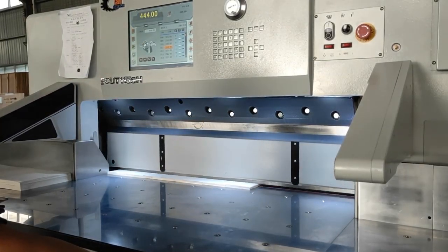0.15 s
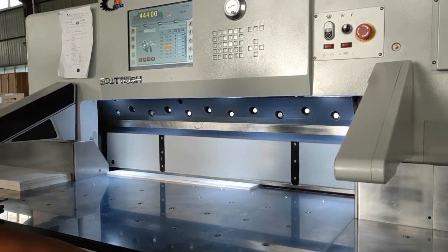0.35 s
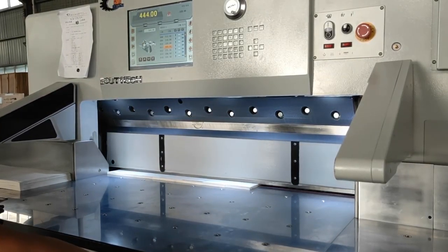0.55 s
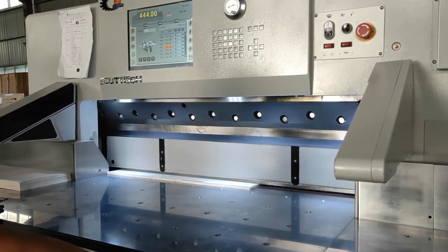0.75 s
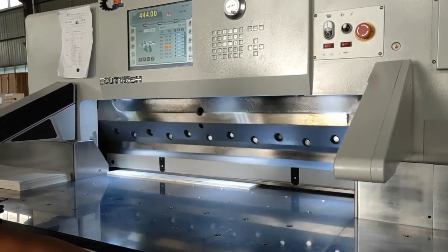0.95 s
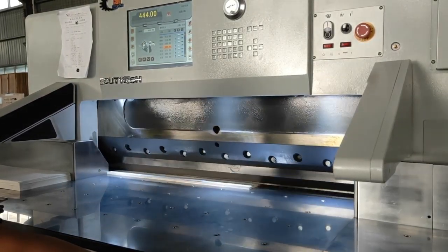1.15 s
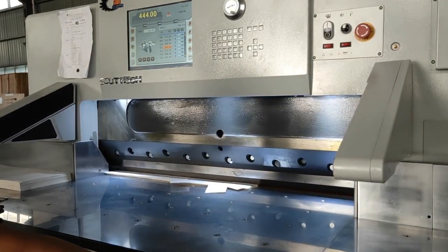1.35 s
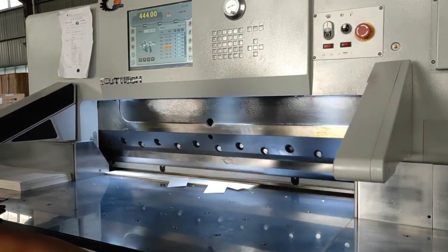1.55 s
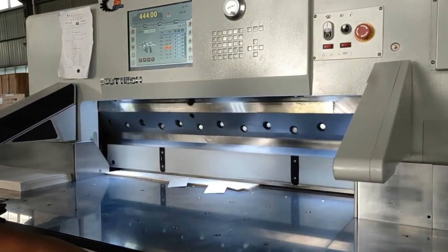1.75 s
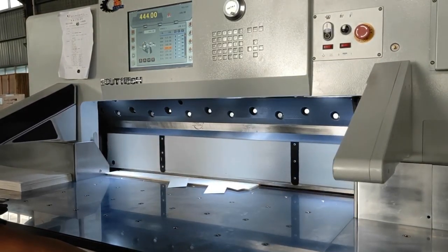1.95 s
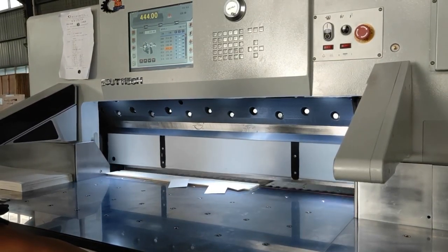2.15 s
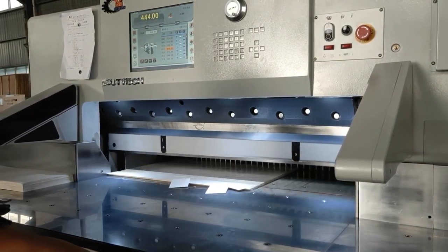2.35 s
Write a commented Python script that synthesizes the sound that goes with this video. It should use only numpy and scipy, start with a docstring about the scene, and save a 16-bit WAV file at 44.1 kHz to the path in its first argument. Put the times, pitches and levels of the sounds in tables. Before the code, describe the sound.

Paper guillotine cycle: heavy clamp thud, gear whir, sharp crunching cut, air hiss, then metallic knocks

```python
"""A workshop with a hydraulic paper cutter, standing to the left: the clamp thumps onto the stack, the drive
engages and hums, the knife shears the paper and hits the bed, air hisses, and the knife bar and clamp knock
at the top of their travel. Blows ring a bank of decaying modes; the hum is a wavering tone; gears, paper,
air and workshop murmur are coloured noise. A decaying noise tail is the room."""
import sys
import numpy as np
from scipy import signal
from scipy.fft import rfft, irfft, next_fast_len
from scipy.io import wavfile
from scipy.ndimage import uniform_filter1d, map_coordinates

SR = 44100
rng = np.random.default_rng(int(sys.argv[2]) if len(sys.argv) > 2 else 0)


def persist_wave(psi):
    """Save psi, clipped to +-1, as 16-bit WAV."""
    counts = np.round(np.clip(psi, -1, 1) * 32767).astype(np.int16)
    wavfile.write(sys.argv[1], SR, np.atleast_2d(counts).T)


def how_loud(loudness_db):
    """Turn decibels into a plain amplitude multiplier (0 dB gives 1, 20 dB gives 10)."""
    steps = np.asarray(loudness_db, float) / 20
    return 10 ** steps


N = 110250

# Workshop murmur of machines. Each row: frequency in Hz, relative density in dB per Hz.
MURMUR_SPECTRUM = [(15, -65.5), (25, -24.5), (81, 5), (118, -12.5), (264, 1.5), (399, -11.5), (533, 5.5),
                   (971, -36.5), (1810, -20), (3500, -25.5), (4550, -55), (7700, -120)]
# Murmur level. Each row: time in seconds, level in dB.
MURMUR_LEVEL = [(0, -49.5), (.2, -50.5), (.6, -53.5), (1.3, -66), (2.3, -76), (2.5, -53)]
# Thin whine of the idling pump. Each row: centre in Hz, width in Hz, level in dB.
PUMP_WHINE = [(1061, 71, -70.5), (2683, 106, -70)]
# Faint background hiss. Each row: frequency in Hz, relative density in dB per Hz.
HISS_SPECTRUM = [(2000, -22), (4500, -17), (7200, -11.5), (9000, -24.5), (11500, -24.5), (13000, -16.5),
                 (14000, -32.5), (16000, -79)]
HISS_DB = -77

# Air flow, early and late stretch. Each row of either: time in seconds, level in dB before AIR_DB.
AIR_FLOWS = [
    [(0.0, -48), (0.15, -59.5), (0.23, -60), (0.304, -49.5), (0.438, -71), (0.6, -100)],
    [(1.3, -43), (1.355, -43), (1.53, -42), (1.6, -39), (1.93, -38.5), (2.14, -39.5), (2.2, -41),
     (2.36, -42.5), (2.5, -53.5)],
]
# Body of the jet. Each row: frequency in Hz, relative density in dB per Hz.
JET_SPECTRUM = [(880, -8), (1500, -4), (1850, -4), (1980, -1), (3060, -4), (4070, -11), (6000, -7),
                (7080, 0.5), (8600, -11.5), (11700, -62)]
# Thin top of the jet. Each row: frequency in Hz, relative density in dB per Hz.
JET_TOP_SPECTRUM = [(5290, -45.5), (9000, -3.5), (9510, -7), (14900, -14.5), (15600, -26)]
# The top of the jet dies first. Each row: time in seconds, level in dB.
JET_TOP_LEVEL = [(1.3, -74), (1.36, -53.5), (1.55, -48.5), (1.6, -46), (2.15, -48), (2.27, -55.5),
                 (2.4, -88.5)]
AIR_DB = 3

# Blows on the machine frame. Each row: start in seconds, relative push in dB, pitch of the struck part in Hz,
# relative crack in dB, relative clatter in dB.
FRAME_BLOWS = [(0.232, -2, 314, -27, -35.5), (0.241, -2.5, 270, -3.5, -27.5), (0.247, 0, 174.4, -14.5, -47),
               (0.264, -9, 221, -18.5, -39), (0.287, -2.5, 195, -29.5, -50), (0.31, -5, 209, -42, -42.5),
               (0.34, -7.5, 213, -32, -37), (0.398, -7.5, 206, -44, -43.5), (0.469, -11.5, 173, -45.5, -96),
               (0.512, -13, 220, -50.5, -94), (0.71, -25, 486, -45, -56), (0.73, -22.5, 302, -31.5, -61),
               (0.806, -32.5, 260, -25.5, -59), (1.283, -5, 362, -32, -22), (1.331, -15.5, 114, -6.5, -63),
               (1.347, -1, 340, -26, -31), (1.357, -0.5, 178, -9.5, -61), (1.375, -4, 314, -39, -41),
               (1.409, -2, 194, -31, -30.5), (1.479, -15.5, 275, -18, -38), (1.491, -23.5, 72, -55, -58),
               (1.996, -14, 266, -26, -29), (2.011, -9, 292, -30, -34), (2.028, -2, 331, -5, -20),
               (2.04, -8.5, 167, -4.5, -33.5), (2.063, -22, 284, -15, -62), (2.083, -15, 125, -43, -35.5),
               (2.14, -24, 475, -16, -21), (2.147, -7, 326, -10, -35.5), (2.157, -13, 380, -49, -65),
               (2.171, -11.5, 240, -17.5, -50), (2.216, -24.5, 80, -58, -31)]
# Modes of the frame. Each row: frequency in Hz, relative level in dB, t60 in seconds.
FRAME_MODES = [(81.6, 4.5, 0.21), (105, 1, 0.35), (139.3, -16, 0.25), (178.5, -7, 0.068),
               (242.3, 10.5, 0.046), (274.6, 2, 0.21), (364.2, 1, 0.31), (468.5, 7, 0.042), (605, 7, 0.015),
               (702, -6.5, 0.087), (846, -2, 0.054), (960, -9, 0.061), (1080, 2.5, 0.0062),
               (1440, -33, 0.014), (1800, -6.5, 0.097), (2670, -19, .03)]
# Loose parts. Each row: frequency in Hz, relative density in dB per Hz.
CLATTER_SPECTRUM = [(400, 1.5), (800, 7), (1200, 2), (1700, -5), (2640, -6.5), (4080, -20), (7130, -17.5),
                    (8300, -23.5), (10100, -44), (15600, -63.5)]
# Bright ticks of steel on steel. Each row: start in seconds, level in dB.
STEEL_TICKS = [(1.409, -28), (2.145, -26)]
TICK_T60_S = 0.069
PUSH_CYCLES = 0.4  # time constant of the push, in cycles of the struck part
THUD_DB, FRAME_DB = 1, -51  # push heard directly, push through the modes
CRACK_DB, CRACK_S, BEAM_HZ = -12.5, 0.00006, 550  # hard contact, on the modes above BEAM_HZ
CLATTER_DB, CLATTER_T60_S, CLATTER_RISE_S = 3, 0.17, 0.002

# Gear-mesh hum. Each row: time in seconds, level in dB.
HUM_LEVEL = [(.56, -85), (.6, -38), (.7, -43.5), (.95, -36), (1.2, -40), (1.4, -35.5), (1.65, -38),
             (1.95, -37), (2.1, -44), (2.3, -51)]
# Gear whir under load. Each row: time in seconds, level in dB before WHIR_DB.
WHIR_LEVEL = [(.71, -88), (.745, -37), (.93, -36), (1.25, -38), (1.6, -39), (1.95, -36.5), (2.05, -53),
              (2.14, -38), (2.25, -46), (2.39, -44), (2.5, -55)]
# Gear noise. Each row: frequency in Hz, relative density in dB per Hz.
GEAR_SPECTRUM = [(350, -55), (600, -27), (710, 2.5), (877, 1.5), (1170, -2.5), (1600, -23), (1970, -23),
                 (4500, -54.5), (5850, -100)]
# Casing resonances. Each row: centre in Hz, width in Hz, boost in dB.
CASING_PEAKS = [(720, 25, 6), (893, 14, 13), (1068, 18, 13), (1150, 18, 15), (1235, 25, 8), (1945, 20, 11),
                (2330, 50, 8)]
# Low gear noise. Each row: time in seconds, level in dB.
GROWL_LEVEL = [(.69, -51), (.72, -28.5), (.88, -36.5), (1.25, -37), (1.6, -33.5), (1.95, -36.5), (2.3, -39),
               (2.5, -52)]
# Housing that colours the growl. Each row: frequency in Hz, relative density in dB per Hz.
HOUSING_SPECTRUM = [(24, -57), (40, -23), (113, -31), (182, -19), (241, -7), (408, -15.5), (509, -20.5),
                    (650, -19.5), (840, -48), (1430, -120)]
MESH_HZ, MESH_WAVER_HZ, MESH_WAVER_DB = 246.5, 1.25, 4
WHIR_DB, SWELL_DB, SWELL_KNOTS_PER_S = 3.5, 1.5, 11.2
SPIN_FROM_S, SPIN_S, SPLIT_HZ = 0.725, 0.047, 710  # gears coming up to speed

# Knife through the stack. Each row: time in seconds, level in dB before SHEAR_DB.
SHEAR_LEVEL = [(1.255, -94), (1.261, -43), (1.266, -18.5), (1.3, -19), (1.315, -30), (1.352, -28),
               (1.36, -57), (1.375, -71.5)]
# Parting paper, also used for the ticks. Each row: frequency in Hz, relative density in dB per Hz.
PAPER_SPECTRUM = [(350, -17), (600, 0), (766, -9), (953, -6.5), (1830, -7.5), (2790, -8.5), (3030, -4.5),
                  (3980, -16), (6950, -4.5), (12800, -27.5), (15500, -20.5)]
SHEAR_DB, SHEETS_PER_S, SHEET_DB = -0.5, 750, 1
BAR_FROM_S, BAR_S, BAR_HZ, BAR_DB = 1.266, 0.061, 366.3, -17

# Left-right likeness of the noises. Each row: frequency in Hz, correlation from 0 to 1.
STEREO_LIKENESS = [(60, 1), (180, 0.92), (400, 0.75), (800, 0.39), (1650, 0.24), (15000, 0.12)]
# Position of the machine. Each row: frequency in Hz, left over right in dB.
LEFT_OVER_RIGHT = [(60, 6), (700, 5.8), (2500, 4), (6000, 7.8), (10000, 5.8), (14000, 7.9)]
LEFT_LEAD_S = 0.00016
# Decay of the room. Each row: frequency in Hz, t60 in seconds.
HALL_T60 = [(100, 0.72), (500, 0.55), (2000, 0.52), (7000, 0.29), (14000, 0.36)]
HALL_DB, KNIFE_HALL_DB = -5, -1  # the clamp shelters the shearing
HALL_LOW_HZ = 195  # the room answers weakly in the bass

CEILING, KNEE = 0.8, 5
LOW_HZ, TOP_HZ, TOP_FADE_HZ = 61, 15950, 350


def unit(x):
    """Scaled to rms 1."""
    return x / np.sqrt(np.mean(x ** 2) + 1e-20)


def along(points, hz):
    """(Hz, value) points read on a log axis."""
    f, v = np.transpose(points)
    return np.interp(np.log(hz + 1), np.log(f + 1), v)


def level(rows, off_db=-130):
    """Gain per sample from (s, dB) rows, off_db outside them."""
    s, db = np.transpose(rows)
    return how_loud(np.interp(np.arange(N) / SR, s, db, left=off_db, right=off_db))


def wobble(knots_per_s):
    """A smooth random curve through normally distributed knots."""
    knots = rng.standard_normal(int(N * knots_per_s / SR) + 4)
    return map_coordinates(knots, [np.arange(N) * knots_per_s / SR])


def filtered(x, response):
    """x times a response of frequency."""
    m = next_fast_len(N + SR // 2)
    return irfft(rfft(x, m) * response(np.fft.rfftfreq(m, 1 / SR)), m)[..., :N]


def colour(points):
    """Gain against frequency from (Hz, dB) points, falling away below the first."""
    return lambda hz: how_loud(along(points, hz)) * np.minimum(hz / points[0][0], 1) ** 2


def peak(centre_hz, width_hz):
    """A narrow resonance."""
    return lambda hz: 1 / (1 + (2 * (hz - centre_hz) / width_hz) ** 2)


def rush(response, patchy_db):
    """Stereo noise, mid at rms 1, with random gain patches in time and frequency."""
    z = signal.stft(rng.standard_normal((2, N)), nperseg=512)[2]
    field = uniform_filter1d(rng.standard_normal(z.shape[1:]), size=6, axis=0)
    field = uniform_filter1d(field, size=10, axis=1)
    pair = signal.istft(z * how_loud(patchy_db * unit(field)), nperseg=512)[1][:, :N]

    def mid_side(hz):
        angle = np.arccos(np.clip(along(STEREO_LIKENESS, hz), -1, 1)) / 2
        return response(hz) * np.array([np.cos(angle), np.sin(angle)])

    mid, side = filtered(pair, mid_side)
    return np.array([mid + side, mid - side]) / mid.std()


def shop():
    """Distant machines as coloured noise, the idling pump as narrow-band noise, and a faint hiss."""
    murmur = level(MURMUR_LEVEL) * rush(colour(MURMUR_SPECTRUM), patchy_db=4.0)
    pump = sum(how_loud(db) * rush(peak(hz, width), patchy_db=3.0) for hz, width, db in PUMP_WHINE)
    hiss = how_loud(HISS_DB) * rush(colour(HISS_SPECTRUM), patchy_db=6.0)
    return murmur + pump + hiss


def air():
    """Escaping air: turbulent noise that dies away at first and again after the cut."""
    flow = level(AIR_FLOWS[0]) + level(AIR_FLOWS[1])
    flow = flow * how_loud(AIR_DB + 0.26 * wobble(29.84))
    body = flow * rush(colour(JET_SPECTRUM), patchy_db=1.57)
    return body + level(JET_TOP_LEVEL) * rush(colour(JET_TOP_SPECTRUM), patchy_db=2.0)


def blows():
    """Short swings of force ring the frame's modes, cracks its upper modes; loose parts clatter, steel ticks."""
    t = np.arange(N) / SR
    push, crack, rattle = np.zeros((3, N))
    start_phase = -2 * np.arctan(2 * np.pi * PUSH_CYCLES)  # gives the swing zero net force
    for s, db, hz, crack_db, clatter_db in FRAME_BLOWS:
        age = np.maximum(t - s, 0)
        u = age * hz / PUSH_CYCLES
        push += how_loud(db) * u * np.exp(-u) * np.sin(2 * np.pi * hz * age + start_phase)
        contact = age / CRACK_S * np.exp(-age / CRACK_S) / (CRACK_S * SR)  # unit area
        crack += how_loud(crack_db + CRACK_DB) * contact
        rise = 1 - np.exp(-age / CLATTER_RISE_S)
        rattle += rise * how_loud(clatter_db + CLATTER_DB - 60 * age / CLATTER_T60_S)
    modes = np.array([(-1) ** k * how_loud(db - 60 * t / t60) * np.sin(2 * np.pi * hz * t)
                      for k, (hz, db, t60) in enumerate(FRAME_MODES)])
    upper = modes[np.array(FRAME_MODES)[:, 0] > BEAM_HZ].sum(axis=0)
    upper = signal.lfilter(*signal.butter(2, BEAM_HZ / 2, 'high', fs=SR), upper)
    ring = how_loud(FRAME_DB) * signal.fftconvolve(push, modes.sum(axis=0))[:N]
    ring = ring + signal.fftconvolve(crack, upper)[:N]
    tick_gain = sum((t > s) * how_loud(db - 60 * np.maximum(t - s, 0) / TICK_T60_S) for s, db in STEEL_TICKS)
    ticks = tick_gain * rush(colour(PAPER_SPECTRUM), patchy_db=2.5)
    clatter = rattle * rush(colour(CLATTER_SPECTRUM), patchy_db=5.0)
    return how_loud(THUD_DB) * push + ring + ticks + clatter


def drive():
    """A wavering gear-mesh hum; once the clutch is in, gears growl in the housing and ring in the casing."""
    phase = 2 * np.pi * np.cumsum(MESH_HZ + MESH_WAVER_HZ * wobble(11.9)) / SR
    hum = how_loud(MESH_WAVER_DB * wobble(23.94)) * np.sin(phase) * np.sqrt(2)
    gears = rush(lambda hz: how_loud(along(GEAR_SPECTRUM, hz)), patchy_db=1.5)
    # each casing resonance swells and fades on its own
    casing = sum(how_loud(db + SWELL_DB * wobble(SWELL_KNOTS_PER_S)) * filtered(gears, peak(hz, width))
                 for hz, width, db in CASING_PEAKS)
    whir = how_loud(WHIR_DB + wobble(40.62)) * unit(gears + casing)
    # the upper gear noise arrives as the gears come up to speed
    low = filtered(whir, lambda hz: 1 / (1 + (hz / SPLIT_HZ) ** 8))
    spin = np.clip((np.arange(N) / SR - SPIN_FROM_S) / SPIN_S, 0, 1) ** 2
    whir = low + (whir - low) * spin
    growl = rush(colour(HOUSING_SPECTRUM), patchy_db=1.5)
    return level(HUM_LEVEL) * hum + level(WHIR_LEVEL) * whir + level(GROWL_LEVEL) * growl


def knife():
    """Sheets part in turn: noise fluttering at the sheet rate; the bar sings under the heaviest load."""
    age = np.arange(N) / SR - BAR_FROM_S
    swell = np.sin(np.pi * np.clip(age / BAR_S, 0, 1)) ** 2
    bar = how_loud(BAR_DB) * swell * np.sin(2 * np.pi * BAR_HZ * age)
    flutter = how_loud(SHEAR_DB + SHEET_DB * wobble(SHEETS_PER_S))
    return level(SHEAR_LEVEL) * flutter * rush(colour(PAPER_SPECTRUM), patchy_db=0.5) + bar


def hall(x):
    """Each frequency of the room's answer dies at its own speed; the bass reaches both sides alike."""
    noise = rush(lambda hz: 1, patchy_db=1.5)[:, :SR]
    hz, t, z = signal.stft(noise, SR, nperseg=256)
    tail = signal.istft(z * how_loud(-60 * t / along(HALL_T60, hz)[:, None]), SR, nperseg=256)[1]
    return signal.fftconvolve(x, tail / np.linalg.norm(tail[0]), axes=1)[:, :N]


def to_left(mix):
    """Left is louder by frequency and leads by a short time; each side takes half of both."""
    half = [0.5, -0.5]
    return filtered(mix, lambda hz: how_loud(np.outer(half, along(LEFT_OVER_RIGHT, hz)))
                    * np.exp(2j * np.pi * np.outer(half, hz) * LEFT_LEAD_S))


def scene():
    """All layers, with the room answering the blows and the knife, placed to the left."""
    frame, cut = blows(), knife()
    room = hall(frame + how_loud(KNIFE_HALL_DB) * cut)
    room = filtered(room, lambda hz: hz / np.hypot(hz, HALL_LOW_HZ))
    return to_left(shop() + air() + frame + drive() + cut + how_loud(HALL_DB) * room)


def low_pass(x):
    """Removes everything above the highest recorded frequency."""
    return signal.sosfilt(signal.butter(12, 16720, fs=SR, output="sos"), x)


def record(dry):
    """Soft overload, then the microphone's band limits."""
    soft = dry / (1 + np.abs(dry / CEILING) ** KNEE) ** (1 / KNEE)

    def band_limits(hz):
        top = np.sin(np.pi / 2 * np.clip((TOP_HZ - hz) / TOP_FADE_HZ, 0, 1)) ** 2
        return 1j * hz / (LOW_HZ + 1j * hz) * top

    return low_pass(filtered(soft, band_limits))


dry = scene()
out = record(dry)
persist_wave(out)
```